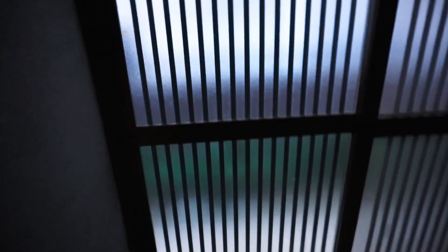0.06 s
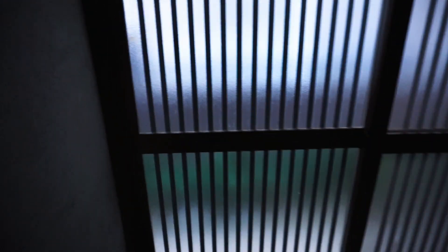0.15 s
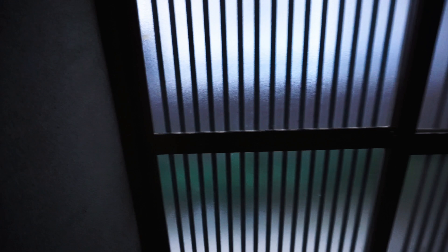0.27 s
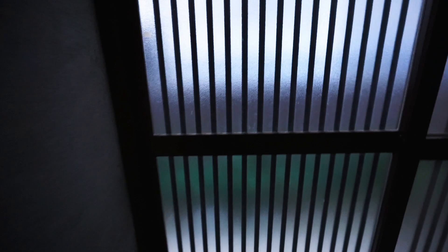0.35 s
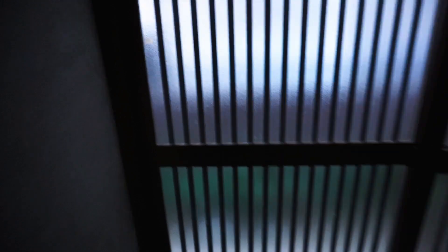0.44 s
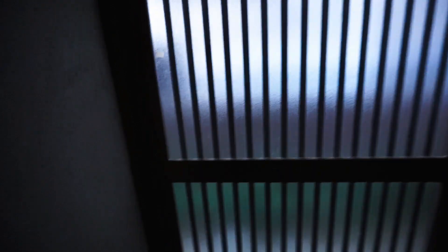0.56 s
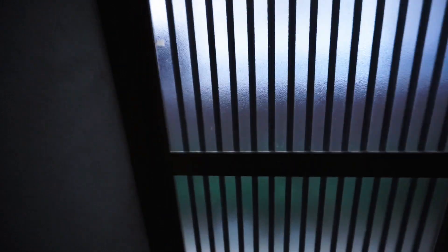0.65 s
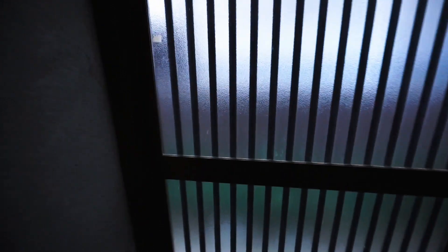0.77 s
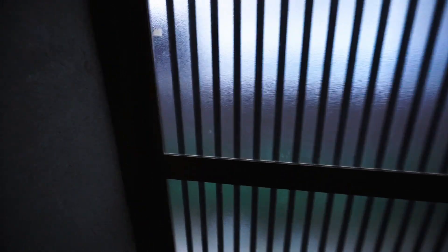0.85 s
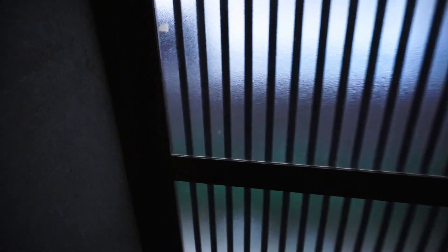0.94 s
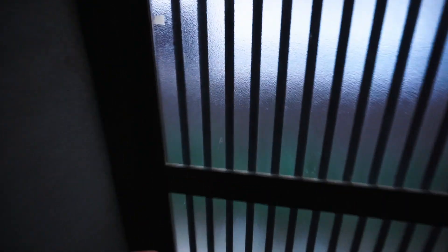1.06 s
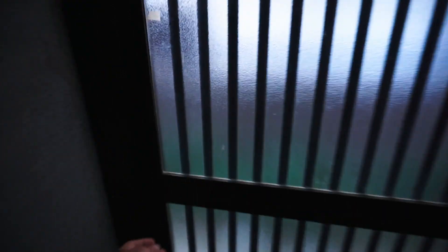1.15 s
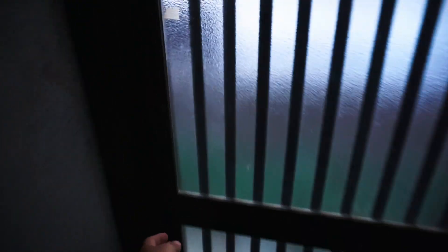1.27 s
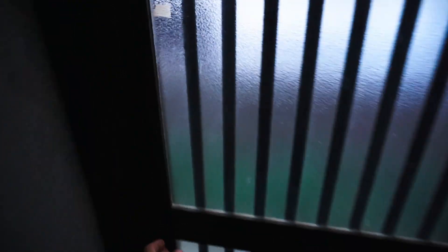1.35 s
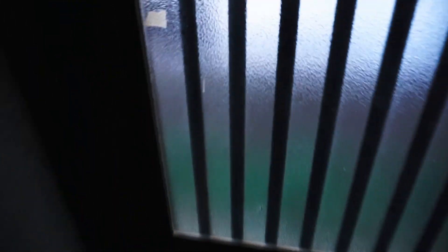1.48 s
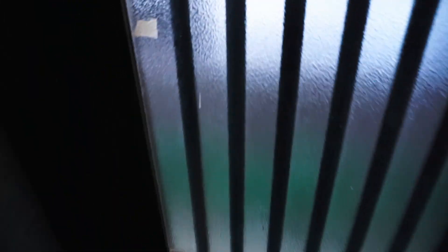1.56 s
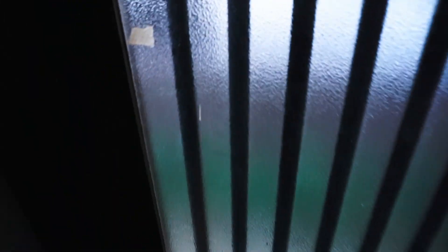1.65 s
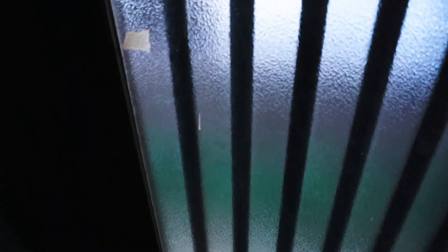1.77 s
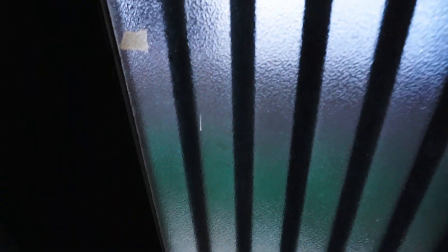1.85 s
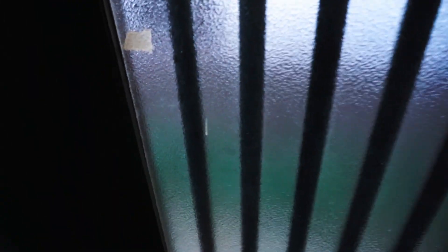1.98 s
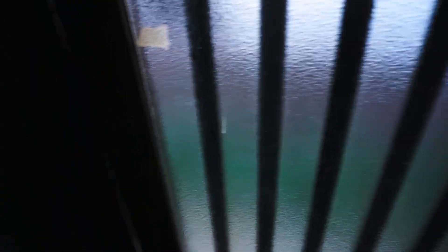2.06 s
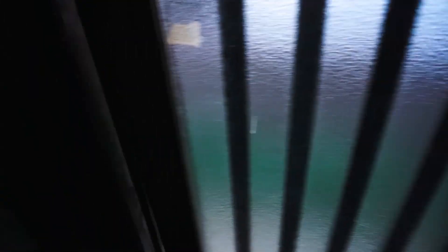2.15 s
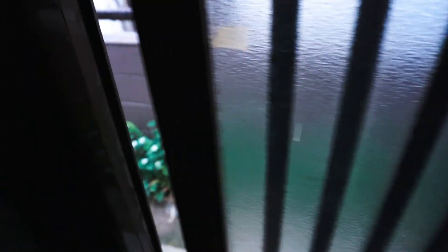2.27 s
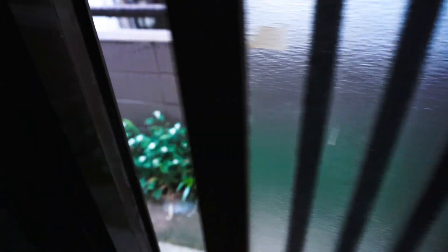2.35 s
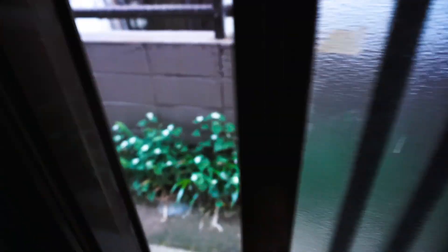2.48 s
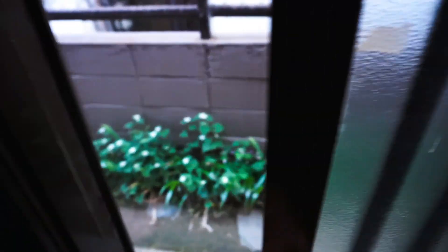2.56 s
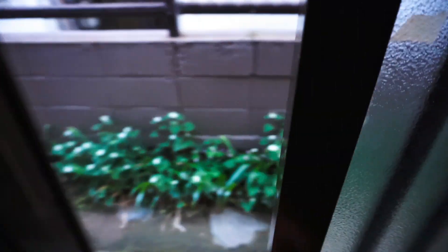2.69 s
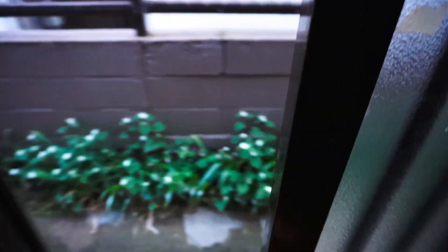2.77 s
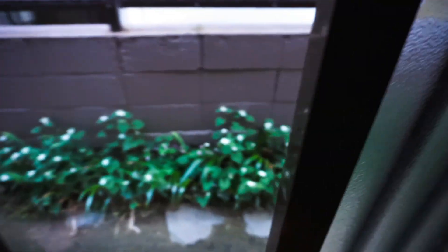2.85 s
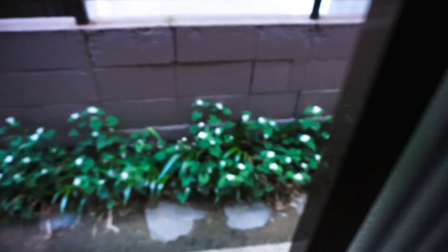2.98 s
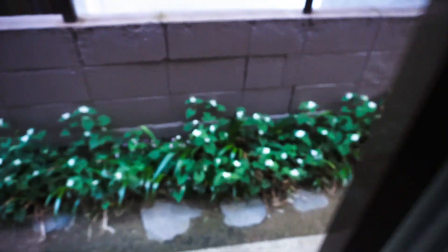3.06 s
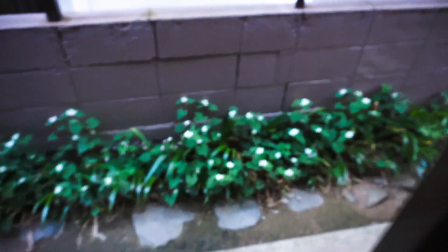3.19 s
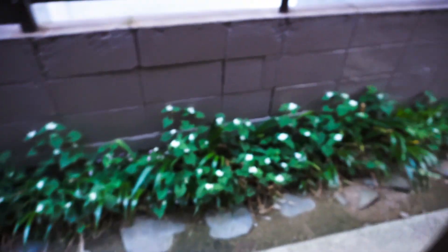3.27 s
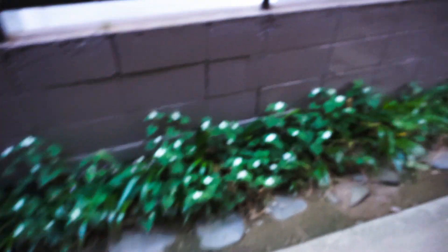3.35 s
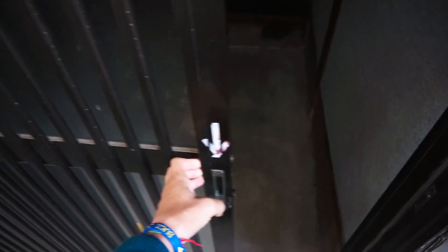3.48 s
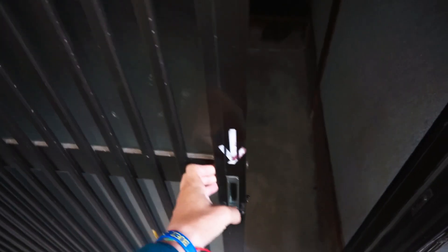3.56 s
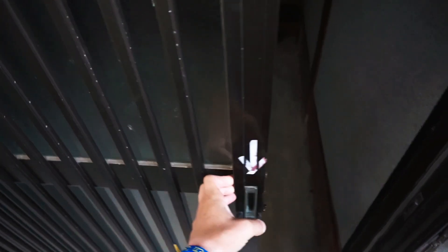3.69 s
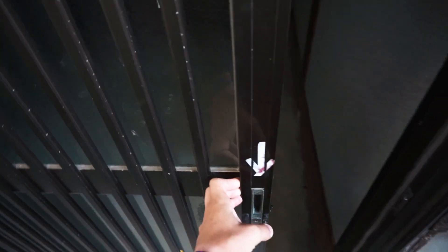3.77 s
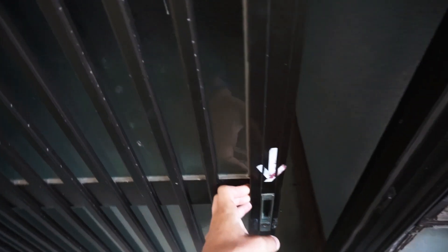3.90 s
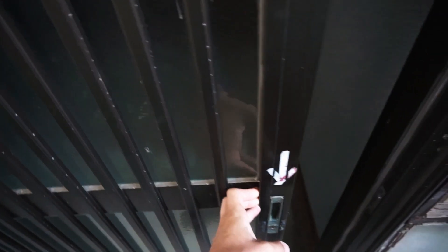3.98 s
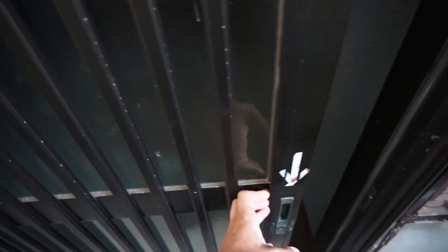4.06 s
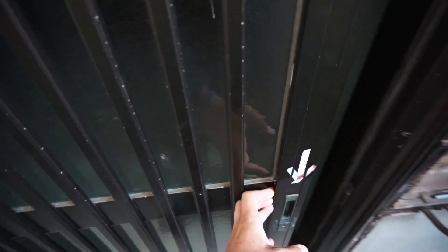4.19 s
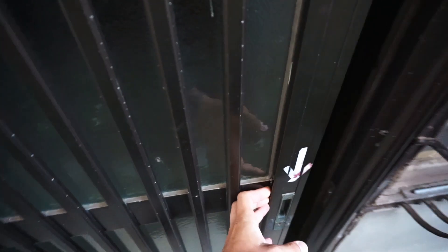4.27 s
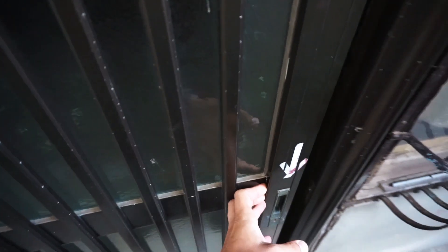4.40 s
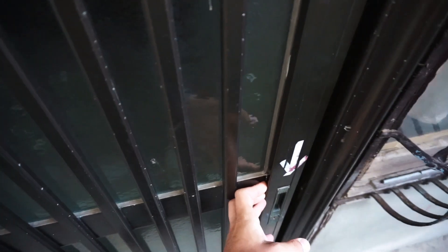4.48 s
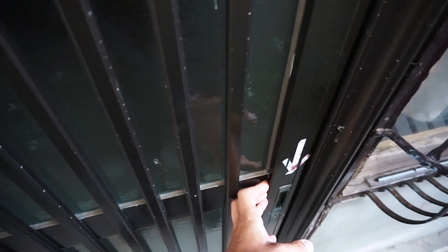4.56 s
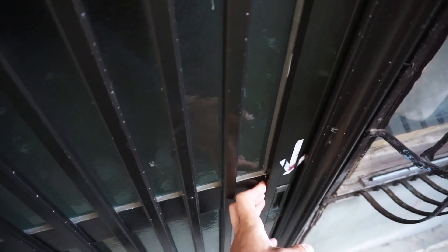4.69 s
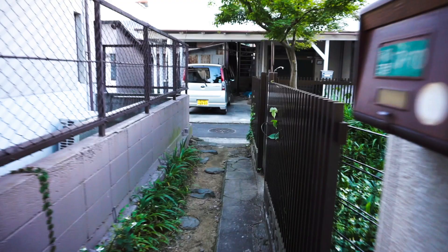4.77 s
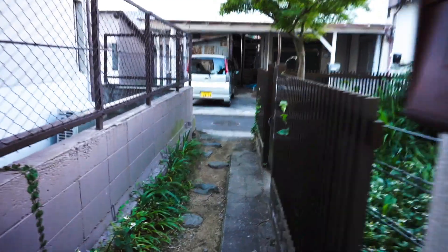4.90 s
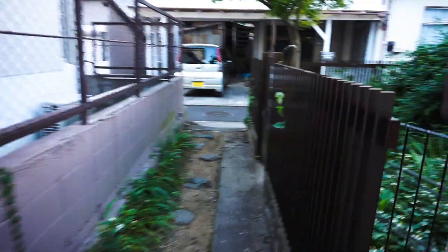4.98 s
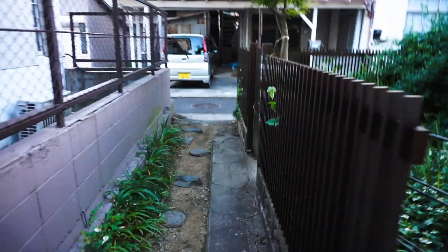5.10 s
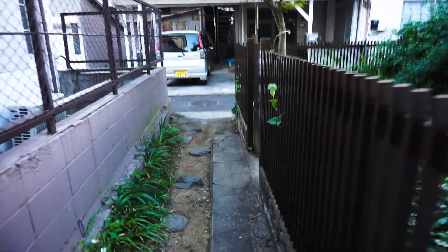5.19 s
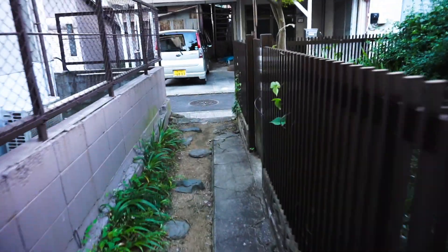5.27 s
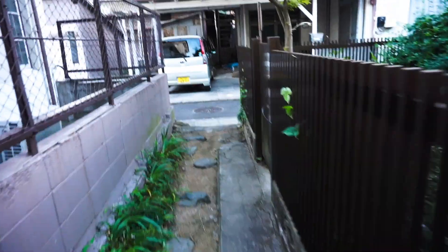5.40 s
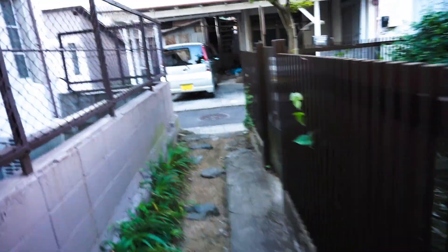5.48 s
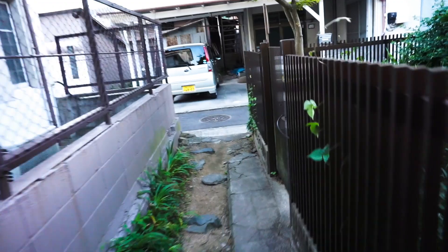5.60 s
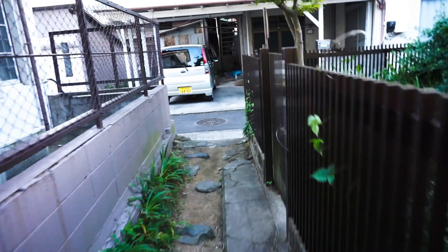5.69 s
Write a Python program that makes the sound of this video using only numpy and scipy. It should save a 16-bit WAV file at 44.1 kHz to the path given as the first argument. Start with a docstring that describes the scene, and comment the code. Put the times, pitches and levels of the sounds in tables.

```python
"""A wooden lattice door with glass panes is unlatched, slid open and drawn shut, close by in a house entrance.
The push on the door drives the drone of its frame and the chatter of its loose panes; bumps in the rail
make them knock. The wheels grind dust and sing faintly, wood binds on the jamb, and the latch clinks.
Soles and sleeves rub before and after, over faint outdoor air; the small porch answers the impacts."""
import sys
import numpy as np
from scipy import signal
from scipy.fft import rfft, irfft, next_fast_len
from scipy.io import wavfile
from scipy.ndimage import uniform_filter1d, map_coordinates

SR = 44100
rng = np.random.default_rng(int(sys.argv[2]) if len(sys.argv) > 2 else 0)


def store_pcm(level_fs):
    """Save levels as 16-bit WAV."""
    pcm = np.round(np.clip(level_fs, -1, 1) * 32767).astype(np.int16)
    wavfile.write(sys.argv[1], SR, np.atleast_2d(pcm).T)


N = 253134
TIME = np.arange(N) / SR
AGE = np.arange(SR // 6) / SR  # s since a contact


def amp(db):
    return 10 ** (np.asarray(db) / 20)


def unit(x):
    return x / np.sqrt(np.mean(x ** 2) + 1e-20)


def crest(x):
    """Scale a hit to rms 1 over its loudest 4 ms."""
    return x / np.sqrt(uniform_filter1d(np.mean(x ** 2, axis=0), SR // 250).max())


def along(points, hz):
    """Interpolate (f/Hz, value) points on a log axis."""
    f, value = np.transpose(points)
    return np.interp(np.log(hz + 1), np.log(f), value)


def curve(points):
    """Interpolate (t/s, value) points per sample."""
    return np.interp(TIME, *np.transpose(points))


def envelope(points):
    """Gain per sample from (t/s, level/dB) points; silent outside them."""
    return amp(np.interp(TIME, *np.transpose(points), left=-120, right=-120))


def wobble(knots_per_s):
    """Smooth random curve."""
    knots = rng.standard_normal(int(N * knots_per_s / SR) + 4)
    return map_coordinates(knots, [TIME * knots_per_s / SR])


def filtered(x, response):
    """Apply a complex frequency response."""
    size = next_fast_len(x.shape[-1] + SR // 20)
    return irfft(rfft(x, size) * response(np.fft.rfftfreq(size, 1 / SR)), size)[..., :x.shape[-1]]


def coloured(x, points, size=2048):
    """Minimum-phase filter through (f/Hz, gain/dB) points."""
    cepstrum = irfft(np.log(amp(along(points, np.fft.rfftfreq(size, 1 / SR)))))
    cepstrum[1:size // 2] *= 2
    cepstrum[size // 2 + 1:] = 0
    impulse = irfft(np.exp(rfft(cepstrum)))
    return signal.fftconvolve(x, impulse[None], axes=1)[:, :x.shape[1]]


def resonances(modes, f):
    """Summed response of (f/Hz, width/Hz, gain/dB) modes."""
    return sum(amp(db) * 1j * f * width / (hz * hz - f * f + 1j * f * width) for hz, width, db in modes)


def through_part(x, part, direct_db, size=8192):
    """Vibration crosses a door part and picks up its (f/Hz, gain/dB, t60/s) modes."""
    modes = [(hz, np.log(1000) / np.pi / t60, db) for hz, db, t60 in part]
    impulse = irfft(1 + resonances(modes, np.fft.rfftfreq(size, 1 / SR)) / amp(direct_db))
    return signal.fftconvolve(x, impulse[None], axes=1)[:, :N]


# Stereo width: f/Hz, side re mid/dB
STEREO_WIDTH = [(60, -26), (130, -46), (330, -22), (600, -9.5), (1200, -7.5), (2400, -3), (5000, 0.5),
                (14000, -1)]
def spread(x):
    """Two unrelated signals become left and right, alike in the bass."""
    def weights(hz):
        share = amp(along(STEREO_WIDTH, hz))
        return np.array([np.ones_like(hz), share]) / np.hypot(1, share)
    mid, side = filtered(x, weights)
    return np.array([mid + side, mid - side])


def grit(per_s, scatter_db):
    """Stream of tiny contacts of uneven size."""
    sizes = (rng.random(N) < per_s / SR) * amp(scatter_db * rng.standard_normal(N))
    return spread(sizes * rng.standard_normal((2, N)))


def onset(rise_s):
    return 1 - np.exp(-AGE / rise_s)


def burst(t60, rise_s):
    """Noise that swells and dies."""
    return spread(rng.standard_normal((2, len(AGE)))) * amp(-60 * AGE / t60) * onset(rise_s)


def ring(modes, scatter_db, drift_hz=25):
    """Damped (f/Hz, level/dB, t60/s) modes, new strengths per hit; looseness makes the phases wander."""
    hz, db, t60 = np.transpose(modes)[:, :, None]
    level = amp(db + scatter_db * rng.standard_normal(hz.shape) - 60 * AGE / t60)
    wander = np.cumsum(rng.standard_normal(level.shape), axis=1) * np.sqrt(2 * np.pi * drift_hz / SR)
    waves = level * np.exp(1j * (2 * np.pi * hz * AGE + wander))
    phases = np.exp(2j * np.pi * rng.random((2, len(modes))))
    return crest(spread((phases @ waves).real * onset(0.00032)))


def clack(hz, t60):
    """Cluster of close modes around one pitch."""
    modes = [(hz * .86, -8, t60), (hz, 0, t60), (hz * 1.07, -6, t60), (hz * 1.22, -9, t60)]
    return ring(modes, scatter_db=1, drift_hz=30.8)


def stroke(s, length_s, t60, rise_s=0.017):
    """Envelope of a rub: rise, hold, fade."""
    return np.clip((TIME - s) / rise_s, 0, 1) * amp(-60 * np.maximum(TIME - s - length_s, 0) / t60)


def add(track, s, sound):
    start = max(0, round(s * SR))
    part = sound[:, :N - start]
    track[:, start:start + part.shape[1]] += part


# Outdoor air: t/s, level/dB
AIR_LEVEL = [(0, -49.5), (0.4, -56.5), (0.9, -53.5), (1.5, -51), (4.6, -42), (5.3, -51.5), (5.74, -50.5)]
# Its spectrum: f/Hz, gain/dB
AIR_SPECTRUM = [(25, -30), (70, -35), (150, -12.5), (300, -8), (900, -0.5), (1600, -0.5), (2800, -3.5),
                (7000, -9), (11700, -8), (16000, -5.5)]
def air(diffuse_db=-3):
    """Faint wash from the lane, partly from all sides."""
    wash = spread(rng.standard_normal((2, N))) + amp(diffuse_db) * rng.standard_normal((2, N))
    return envelope(AIR_LEVEL) * unit(coloured(wash, AIR_SPECTRUM))


# Low rumble: t/s, level/dB
RUMBLE_LEVEL = [(0.9, -82), (1.3, -66), (1.5, -59), (2.0, -60.5), (2.16, -62), (2.26, -43), (2.46, -37),
                (2.7, -42), (2.95, -60), (3.55, -60), (4.06, -42), (4.38, -41), (4.62, -49), (4.78, -41.5),
                (5.05, -65), (5.74, -65.5)]
# Its spectrum: f/Hz, gain/dB
RUMBLE_SPECTRUM = [(20, 15.5), (45, -24), (80, 2.5), (125, 10.5), (200, 8), (280, 6), (500, 5),
                   (1000, -53.5)]
def rumble(bumps):
    """Low rumble: faint background before and after, swelling as the door rolls and shuts."""
    return envelope(RUMBLE_LEVEL) * unit(coloured(grit(2500, 0.96) * bumps, RUMBLE_SPECTRUM))


# Porch decay: f/Hz, t60/s
PORCH_DECAY = [(150, 0.48), (1000, 0.13), (4000, 0.17), (14000, 0.32)]
def porch(x):
    """Wall reflections; each frequency dies at its own rate."""
    hz, t, noise = signal.stft(rng.standard_normal((2, SR // 2)), SR, nperseg=256)
    decay = amp(-60 * t / along(PORCH_DECAY, hz)[:, None])
    tail = spread(signal.istft(noise * decay, SR, nperseg=256)[1])
    delayed = np.pad(tail / np.linalg.norm(tail[0]), ((0, 0), (SR // 150, 0)))
    return signal.fftconvolve(x, delayed, axes=1)[:, :N]


# Settling foot: f/Hz, gain/dB
SOLE_SPECTRUM = [(30, -14), (70, -13), (130, 1), (190, -4), (260, -10), (500, -17), (1500, -25),
                 (5000, -58)]
def footfall(peak_s=5.505, level_db=-38, rise_t60=0.12, fall_t60=0.11):
    """A foot rolls onto the path: the weight builds, then settles."""
    load_db = -60 * np.maximum((peak_s - TIME) / rise_t60, (TIME - peak_s) / fall_t60)
    return amp(level_db + load_db) * unit(coloured(grit(4000, 1), SOLE_SPECTRUM))


# Sleeve swishes: t/s, half length/s, level/dB
SLEEVE_SWISHES = [(1.183, .014, -46), (1.405, 0.052, -40.5), (4.94, .03, -40)]
# Cloth: f/Hz, gain/dB
SLEEVE_SPECTRUM = [(4000, -25), (8000, -10), (10500, -4), (13300, 2), (16000, -3)]
def swishes():
    """Smooth cloth slides with a very high hiss."""
    swell = sum(amp(db) * np.exp(-((TIME - s) / half_s) ** 2) for s, half_s, db in SLEEVE_SWISHES)
    return swell * unit(coloured(grit(25000, 2), SLEEVE_SPECTRUM))


# Sole drags: t/s, length/s, t60/s, level/dB
SOLE_DRAGS = [(0.44, 0.26, 0.52, -56.5), (0.634, 0.038, .15, -61), (5.123, 0.059, 0.19, -53)]
def drags():
    """Soft soles rub with a hollow note."""
    hollow = [(150, -24), (380, -6.5), (500, -14), (720, -4), (1000, -10), (2500, -23), (8000, -38)]
    level = sum(amp(db) * stroke(s, length_s, t60) for s, length_s, t60, db in SOLE_DRAGS)
    return level * unit(coloured(grit(4000, 2), hollow))


# Fine contacts: f/Hz, gain/dB
HISS_SPECTRUM = [(2000, -8), (5000, 4), (7500, 2), (10500, 3), (12500, 2.5), (14500, -2), (16000, 6)]
def rubs(strokes, spectrum, grip_db, rough_db):
    """Rubbing is a dense stream of slips: coarse ones scrape, fine ones hiss."""
    coarse, fine = sum(amp([[coarse_db], [fine_db]]) * stroke(s, length_s, t60)
                       for s, length_s, t60, coarse_db, fine_db in strokes)
    grip = amp(grip_db * wobble(120))
    scrape = coarse * unit(coloured(grit(15000, rough_db) * grip, spectrum))
    hiss = fine * unit(coloured(grit(25000, 3.6) * grip, HISS_SPECTRUM))
    return scrape, hiss


# Scuffs: t/s, length/s, t60/s, scrape/dB, hiss/dB
SCUFF_STROKES = [(-.02, 0.094, 0.032, -46, -41), (0.443, 0.019, 0.76, -52, -43.5),
                 (0.597, 0.02, 0.74, -49, -41.5), (0.799, 0.034, 0.29, -52, -52),
                 (1.157, 0.022, 0.23, -59, -51), (1.199, 0.096, 0.37, -52.5, -52),
                 (1.303, 0.14, 0.22, -47.5, -45), (4.874, 0.082, 0.57, -44, -37),
                 (5.523, 0.047, 0.34, -50, -50.5), (5.648, 0.033, 0.15, -52, -51)]
# Their scrape: f/Hz, gain/dB
SCUFF_SPECTRUM = [(40, -43), (130, -8), (300, -1.5), (750, 3), (1500, 0.5), (2800, 1.5), (4000, -1),
                  (5200, -8.5), (7500, -10), (12000, -64)]
def scuffs():
    """Soles rub on concrete, sleeves on cloth."""
    scrape, hiss = rubs(SCUFF_STROKES, SCUFF_SPECTRUM, grip_db=1.1, rough_db=4)
    cloth = [(3000, 0.32), (7000, -1.4), (10000, 1.0), (13000, 0.94), (16000, -0.82)]
    return scrape + coloured(hiss, cloth)


# Soft steps and bumps: t/s, relative level/dB, f/Hz, t60/s
SOFT_CONTACTS = [(0, -46, 182, 0.1), (0.451, -37, 340, 0.0086), (1.233, -34.5, 276, 0.015),
                 (1.26, -39.5, 155, 0.063), (1.321, -24, 298, 0.012), (1.35, -34, 162, 0.067),
                 (1.613, -25.5, 300, 0.017), (2.102, -32, 810, 0.076), (4.665, -32.5, 222, 0.028),
                 (4.704, -27, 108, 0.02), (4.763, -24, 194, 0.0093), (4.79, -23, 172, 0.01),
                 (4.871, -27, 242, 0.041), (4.897, -27.5, 136, 0.015), (4.978, -35.5, 236, 0.1),
                 (5.129, -39, 450, 0.012), (5.498, -31.5, 170, 0.014)]
def thuds(level_db=-5, puff_db=-9):
    """A soft contact is a low damped push with a dull puff."""
    out = np.zeros((2, N))
    for s, db, hz, t60 in SOFT_CONTACTS:
        swell = onset(1 / (1.5 * hz))  # within the first cycle
        push = np.gradient(np.sin(2 * np.pi * hz * AGE) * amp(-60 * AGE / t60) * swell)
        dull = [(hz / 4, -25), (hz, 0), (hz * 1.47, -7), (hz * 4, -22), (hz * 30, -55)]
        puff = coloured(burst(0.16, 0.0028), dull)
        add(out, s, amp(db + level_db) * (crest(push[None]) + amp(puff_db) * crest(puff)))
    return out


# Grit and fittings: t/s, relative level/dB, f/Hz, t60/s, ringing share/0-1
DRY_TICKS = [(.004, -22, 3440, 0.06, 0.96), (0.047, -25, 3200, 0.089, 0.2),
             (0.067, -12.5, 3600, 0.014, 0.12), (0.708, -32.5, 11000, 0.071, 0.1),
             (0.825, -34.5, 3500, 0.082, 0.06), (.845, -26, 3880, 0.036, 0.8),
             (1.587, -6.5, 12500, 0.034, 0), (1.851, -22, 3000, 0.015, 0), (1.869, -39, 5000, 0.0089, 0),
             (1.881, -29, 3080, 0.011, 0), (1.893, -27, 9100, .01, 0.3), (2.067, -21.5, 9240, 0.027, 1),
             (2.478, -22, 2420, 0.011, 0.3), (2.579, -5, 3640, 0.0054, 0.14),
             (4.043, -14.5, 14200, 0.032, 0.4), (4.312, -18.5, 13200, 0.046, 0.3),
             (4.664, -26, 12200, 0.087, 0.15), (4.7097, -7, 3700, 0.0062, 0.1), (4.711, -23, 970, 0.099, 1),
             (5.088, -26.5, 11300, 0.035, 0.04), (5.129, -32, 960, 0.025, 0),
             (5.244, -35, 2540, 0.035, 0.2)]
def ticks(level_db=-10):
    """Tiny snaps, each around its own pitch; hard pieces ping."""
    out = np.zeros((2, N))
    for s, db, hz, t60, share in DRY_TICKS:
        spectrum = [(hz / 8, -20), (hz / 2, -8), (hz, 0), (hz * 1.22, -8), (hz * 4, -14)]
        snap = crest(coloured(burst(t60, 0.00006), spectrum))
        ping = ring([(hz, 0, t60)], scatter_db=0)
        add(out, s, amp(db + level_db) * (np.sqrt(1 - share) * snap + np.sqrt(share) * ping))
    return out


def metal(hits, modes, spectrum, level_db, t60, rough_db):
    """Small metal pieces strike: a gritty crack and a high ring."""
    out = np.zeros((2, N))
    for s, db, ring_db in hits:
        teeth = amp(rough_db * wobble(500)[:len(AGE)])
        crack = crest(coloured(burst(t60, 0.00063) * teeth, spectrum))
        ringing = amp(ring_db) * ring(modes, scatter_db=2.6, drift_hz=30)
        add(out, s, amp(db + level_db) * crest(crack + ringing))
    return out


# Jingles: t/s, relative level/dB, ring re crack/dB
JINGLE_HITS = [(.003, -33, 5), (4.716, -24, 3), (4.726, -17.5, 5), (4.748, -20, 0)]
# Small metal parts: f/Hz, level/dB, t60/s
JINGLE_MODES = [(11400, -9, .06), (12800, -7, .06), (13500, -6, .07), (13879, -4, .1), (14100, -6, .08),
                (14465, 0, .12), (15020, -7, .07), (15320, -1, .12)]
def jingles():
    """Small metal parts strike together, left of centre."""
    hits = metal(JINGLE_HITS, JINGLE_MODES, HISS_SPECTRUM, level_db=0.5, t60=0.14, rough_db=3)
    return hits * amp([[1.5], [-2]])


# Latch clinks: t/s, relative level/dB, ring re crack/dB
LATCH_HITS = [(3.477, -20.5, -8), (3.503, -25, -4), (3.515, -15, -12), (3.572, -26, -10), (3.587, -18, -5),
              (3.592, -21, -9), (3.597, -10, 5.5), (3.602, -16, 11)]
# Latch ring: f/Hz, level/dB, t60/s
LATCH_MODES = [(8630, 8, 0.04), (8950, 8, 0.054), (9621, 8, 0.11), (9796, 6, 0.17), (10100, -5, 0.06),
               (12310, -6, .07), (12700, 2, 0.055), (15570, -5, 0.068)]
# Latch scrape: f/Hz, gain/dB
LATCH_SPECTRUM = [(3000, -1), (6500, -5), (7900, -1), (8800, 3.5), (10200, 3), (11400, -1), (12700, 3),
                  (14000, -7), (15000, -6), (15700, 3.5)]
def latch():
    """The latch scrapes and rings as it swings free."""
    return metal(LATCH_HITS, LATCH_MODES, LATCH_SPECTRUM, level_db=-6.5, t60=0.13, rough_db=3.5)


# Catch ring: f/Hz, level/dB, t60/s
CATCH_MODES = [(1130, -18, 0.055), (2130, 0, .06), (2474, 5, 0.039), (3180, -1, 0.057), (3950, -2, .05),
               (4380, -7, .05)]
def catch(start_s=2.066, level_db=-24, crack_db=-5):
    """The door leaves its catch with one bright clack."""
    out = np.zeros((2, N))
    bright = [(500, -18), (2500, 2), (4500, 3.5), (6000, -8), (9000, -4), (15000, -18)]
    crack = crest(coloured(burst(0.08, 0.0026), bright))
    ringing = ring(CATCH_MODES, scatter_db=1, drift_hz=34) * onset(0.0017)
    add(out, start_s, amp(level_db) * crest(ringing + amp(crack_db) * crack))
    return out


# Door on jamb: t/s, length/s, t60/s, relative scrape/dB, hiss/dB
JAMB_STROKES = [(1.59, 0.085, 0.46, -29, -27.5), (1.71, 0.048, 0.26, -32, -32),
                (1.845, 0.029, 0.062, -39.5, -40), (4.695, 0.053, 0.33, -24.5, -25),
                (4.81, 0.038, 0.019, -32.5, -33.5)]
# Wood scrape: f/Hz, gain/dB
JAMB_SPECTRUM = [(40, -36), (130, -7), (320, 6), (520, -0.5), (700, -0.5), (1500, -0.5), (2800, 3.5),
                 (4000, 4), (5200, 0), (7500, -7), (12000, -35)]
# Door edge and lock: f/Hz, level/dB, t60/s
EDGE_MODES = [(500, -11, .06), (690, -6, .08), (960, -4, .08), (1130, -4, .08), (1281, 0, .07),
              (1750, -5, .08), (2200, -5, .06), (2500, -2, .06), (3060, -1, .06), (3510, -5, .04),
              (4040, -3, .06), (4807, -7, .05)]
def jamb(scrape_db=-3):
    """Wood binds on wood as the door comes free and shuts; its edge rings along."""
    scrape, hiss = rubs(JAMB_STROKES, JAMB_SPECTRUM, grip_db=1, rough_db=1.5)
    return amp(scrape_db) * through_part(scrape, EDGE_MODES, direct_db=-3) + hiss


# Blows of latch and door: t/s, relative level/dB, t60/s, f/Hz
EDGE_BLOWS = [(1.583, -13, 0.072, 4010), (1.587, -12, 0.026, 1300), (1.655, -24.5, 0.058, 4040),
              (1.667, -37, 0.073, 3600), (1.728, -17, 0.17, 1780), (1.744, -16.5, 0.2, 3960),
              (4.6645, -10, 0.067, 2930), (4.6675, -9, 0.035, 1326), (4.722, -13, 0.036, 2980),
              (4.747, -29, .04, 3250), (4.791, -17, 0.047, 1960), (4.828, -23, .035, 3770),
              (4.841, -38, 0.032, 4240)]
# Impact: f/Hz, gain/dB
BLOW_SPECTRUM = [(60, -105), (200, -11), (500, 5.5), (1100, -0.5), (2400, 2.5), (3800, 4), (5500, -9.5),
                 (10000, -7.5), (15000, -11)]
# Outer lattice: f/Hz, level/dB, t60/s
LATTICE_MODES = [(998, -11, 0.095), (1154, -7, 0.089), (1438, -6.5, 0.083), (2226, -5.5, 0.084),
                 (2550, -6, 0.048), (3750, -5, 0.033), (4050, 3, 0.029)]
def blows(level_db=-10, note_db=-7, ring_db=-2):
    """Hard, damped impacts ring the door's edge and shake the lattice."""
    out = np.zeros((2, N))
    for s, db, t60, hz in EDGE_BLOWS:
        impact = crest(coloured(burst(t60, 0.0012), BLOW_SPECTRUM))
        edge = amp(ring_db) * ring(EDGE_MODES, scatter_db=6.2, drift_hz=21) * onset(0.0056)
        note = amp(note_db) * clack(hz, t60)
        add(out, s, amp(db + level_db) * crest(impact + note + edge))
    return through_part(out, LATTICE_MODES, direct_db=2)


# Wheel squeals, one list each: t/s, f/Hz, level/dB
WHEEL_SQUEALS = [
    [(2.66, 10600, -57), (2.72, 10850, -48), (2.8, 11250, -52), (2.88, 11400, -64)],
    [(2.72, 12800, -55), (2.79, 13250, -46), (2.86, 12900, -55)],
    [(4.1, 11600, -60), (4.18, 11600, -50), (4.24, 11900, -58), (4.3, 12400, -49)],
    [(4.33, 11700, -51), (4.37, 10900, -52), (4.39, 10600, -60), (4.42, 10300, -54), (4.48, 9300, -58),
     (4.52, 8800, -64)],
]
def squeals():
    """A dry wheel sings in thin, scratchy snatches; the last one falls in pitch."""
    out = np.zeros(N)
    for squeal in WHEEL_SQUEALS:
        s, hz, db = np.transpose(squeal)
        pitch_hz = np.interp(TIME, s, hz) * (1 + .006 * wobble(500) + .004 * wobble(40))
        grip = np.clip(.55 + .5 * wobble(55), 0, 1.1)
        out += grip * envelope(np.transpose([s, db])) * np.sin(2 * np.pi * np.cumsum(pitch_hz) / SR)
    return out


# Push on the door: t/s, level/dB (full speed at full_db)
DOOR_PUSH = [(2.0, -78), (2.15, -49), (2.27, -36.5), (2.4, -29), (2.52, -27), (2.6, -27.5), (2.72, -26),
             (2.95, -26.5), (3.14, -26), (3.24, -29), (3.48, -36), (3.66, -33), (3.78, -36), (3.9, -33),
             (4.17, -36), (4.34, -44), (4.52, -58), (4.66, -78)]
def speed(full_db=-25.5):
    """Door pace: 1 at full push, 0 at rest."""
    moving = (TIME > DOOR_PUSH[0][0]) * (TIME < DOOR_PUSH[-1][0])
    return envelope(DOOR_PUSH) / amp(full_db) * moving


def sand(level_db=-45, speed_power=0.19):
    """Coarse grains crack under the wheels as sparse ticks."""
    grains = signal.fftconvolve(grit(70, 4), burst(.008, .0002), axes=1)[:, :N]
    return amp(level_db) * speed() ** speed_power * unit(coloured(grains, HISS_SPECTRUM))


# Rail dust: f/Hz, gain/dB
DUST_SPECTRUM = [(2000, 1), (5000, -26), (8000, -11), (10500, 2), (12800, 7), (14500, 6), (16000, -19)]
def dust(bumps, level_db=-42, speed_power=0.32):
    """Dust hisses under the wheels."""
    hiss = unit(coloured(grit(11000, 4) * bumps, DUST_SPECTRUM))
    return amp(level_db) * speed() ** speed_power * hiss


# Rattling glass: f/Hz, gain/dB
GLASS_SPECTRUM = [(100, -20), (600, -9), (900, -1), (1200, -0.5), (2300, -3), (2900, -5), (3700, -5.5),
                  (4700, -7.5), (6500, -10), (10000, -15), (15000, -21.5)]
# First pane to rattle: f/Hz, level/dB, t60/s
FRONT_PANE_MODES = [(1167, -10, 0.23), (1522, -8, 0.1), (2050, -2, 0.06), (2373, 0, 0.05),
                    (2560, -9, 0.058), (3460, -10, .09), (3820, -5.5, .08), (4270, -7, 0.056)]
# Second pane: f/Hz, level/dB, t60/s
REAR_PANE_MODES = [(1156, -4.5, 0.066), (1484, -2, 0.11), (1825, -3, 0.056), (2047, -4, 0.073),
                   (2290, -5, .07), (2644, -3.5, .06), (3000, -2.5, .07), (4000, -5, 0.048)]
REAR_PANE_S, OUTDOORS_S = 2.66, 3.45  # second pane takes over; listener is past the doorway
def chatter(bumps, level_db=-37.5, speed_power=0.24):
    """Front pane, rear pane and lattice tremble in turn as the door moves."""
    shake = coloured(grit(6000, 0.17), GLASS_SPECTRUM)
    front, rear, lattice = (unit(through_part(shake, modes, direct_db=-5))
                            for modes in (FRONT_PANE_MODES, REAR_PANE_MODES, LATTICE_MODES))
    tremble = np.select([TIME < REAR_PANE_S, TIME < OUTDOORS_S], [front, rear], lattice)
    return amp(level_db) * speed() ** speed_power * unit(tremble * bumps)


# Frame at rest: f/Hz, width/Hz, gain/dB
FRAME_MODES = [(142.6, 3, -16), (193, 9, -3), (315, 8, -1), (347.8, 12, 9.5), (378, 18, 1), (410, 20, -7),
               (452, 18, -2), (526.5, 10, -11), (694, 16, -14)]
# Frame loosening: t/s, share/0-1
FRAME_LOOSENESS = [(3.3, 0), (3.8, .35), (4.3, .6)]
# Main note under wheel load: t/s, f/Hz
FRAME_PITCH = [(2.15, 336), (2.42, 339), (2.56, 359.3), (2.88, 361.3), (3.0, 346.1), (3.36, 341.6),
               (3.63, 365.1), (3.86, 355.7), (4.12, 342), (4.4, 310.6)]
# Dents in the rail: t/s, swell/dB
RAIL_JOLTS = [(2.28, 9.5), (2.447, 6), (2.516, 3), (2.551, 4), (2.574, 10), (2.61, 5.5), (2.627, 8.5),
              (2.693, 4), (2.726, 6), (2.757, 5), (2.797, 3), (2.821, 5.5), (2.855, 5.5), (2.905, 7),
              (2.937, 10), (2.96, 6), (2.987, 8.5), (3.024, 4), (3.048, 6), (3.071, 2.5), (3.107, 3),
              (3.134, 6.5), (3.157, 3), (3.64, 8), (3.7, 6), (3.914, 5), (4.02, 5)]
def drone(level_db=-29.5, judder_db=1.5, rest_hz=348, widen_hz=58, jolt_s=0.008):
    """The frame hums on the rough rail, swells at jolts, drifts in pitch and blurs late in the slide."""
    rail = grit(8000, 1)
    def shaken(modes):
        return unit(filtered(rail, lambda f: resonances(modes, f) / (1 + 1j * f / 900)))
    loose = curve(FRAME_LOOSENESS)
    wide_modes = [(hz, width + widen_hz, db) for hz, width, db in FRAME_MODES]
    frame = (1 - loose) * shaken(FRAME_MODES) + loose * shaken(wide_modes)
    power = uniform_filter1d(np.mean(frame ** 2, axis=0), SR // 60)
    frame = frame / np.abs(power) ** (1 / 3)  # joint friction evens out the swing
    clock = np.cumsum(curve(FRAME_PITCH) / rest_hz)
    bent = np.array([np.interp(clock, np.arange(N), side) for side in frame])
    jolts_db = sum(db * np.exp(-((TIME - s) / jolt_s) ** 2) for s, db in RAIL_JOLTS)
    return amp(level_db) * speed() * unit(bent * amp(jolts_db + judder_db * wobble(55)))


def rolling(bumps_db=1.5):
    """Over the low rumble, wheels on a rough rail shake glass and frame and grind dust and sand."""
    bumps = amp(bumps_db * wobble(30))
    return rumble(bumps) + chatter(bumps) + dust(bumps) + drone() + sand()


# Pane knocks: t/s, relative level/dB, f/Hz, treble/dB, buzz t60/s
PANE_KNOCKS = [(1.99, -40.5, 2510, 2, 0.042), (2.172, -22, 2510, -5, .06), (2.218, -24, 2310, -7, 0.054),
               (2.256, -25.5, 2380, 1, .035), (2.276, -19.5, 2176, -24, .055),
               (2.343, -16.5, 2434, 1.5, 0.056), (2.423, -25, 2310, 1, 0.18),
               (2.471, -16.5, 2440, -2, 0.052), (2.515, -23.5, 2355, 2, 0.11), (2.535, -20, 2365, -7, 0.13),
               (2.573, -16, 3478, 3, 0.097), (2.614, -21.5, 2144, -3, 0.086), (2.679, -24, 2170, 1, 0.13),
               (2.693, -23.5, 1523, -4, 0.15), (2.731, -20, 1456, -2, 0.11), (2.758, -29, 1500, 0, .08),
               (2.805, -26.5, 1810, 8, 0.065), (2.817, -17.5, 1800, 2.5, 0.059),
               (2.886, -26, 1920, 5, 0.21), (2.929, -21.5, 1787, 5.5, 0.087), (2.943, -24, 1870, -15, 0.1),
               (3.022, -18, 1770, 5, 0.13), (3.058, -22, 1870, 1, 0.12), (3.102, -22.5, 1496, 3, 0.093),
               (3.114, -22, 1554, 2, 0.12), (3.151, -20, 2120, 2, 0.089), (3.238, -24, 2137, -2, 0.083),
               (3.294, -29.5, 1634, -8, 0.11), (3.353, -32, 1652, -3, 0.073), (3.411, -27, 2416, -8, 0.063),
               (3.481, -23.5, 1880, -3, 0.12), (3.618, -26, 1285, -1, 0.093), (3.664, -26.5, 997, 5, 0.046),
               (3.712, -25.5, 3600, 6, 0.041), (3.765, -27, 1077, -2, 0.04), (3.836, -28, 2210, 3, 0.1),
               (3.885, -25, 1166, 6, 0.14), (3.912, -30.5, 1294, -10, 0.11), (4.021, -29, 1244, 5, .07),
               (4.071, -29, 1026, 12, 0.049), (4.094, -20.5, 2536, -1.5, 0.054),
               (4.117, -26.5, 2300, 1, 0.099), (4.171, -27.5, 1180, 2, .06), (4.23, -25, 1186, -8, 0.048),
               (4.289, -23.5, 1160, -3, 0.056), (4.356, -28.5, 1166, -7, 0.036),
               (4.43, -30.5, 1220, -1, 0.086), (4.487, -34.5, 2710, 24, 0.049),
               (4.527, -23.5, 1250, 0.5, 0.066)]
# Buzz heard from indoors: f/Hz, gain/dB
INDOOR_SPECTRUM = [(500, -12.5), (1300, -4.5), (2200, 1.5), (3800, -1.5), (7000, -4.5), (14000, -2)]
# Buzz heard from outdoors: f/Hz, gain/dB
OUTDOOR_SPECTRUM = [(500, 1), (1300, -2.5), (2200, 2.5), (3800, 3.5), (7000, -1.5)]
def knocks(level_db=-2, modes_db=-2, note_db=-5, full_speed_rise_s=0.005, ring_cycles=110):
    """Rail bumps make a pane buzz against the wood and ring; one pitch stands out."""
    out = np.zeros((2, N))
    pace = np.clip(speed(), .1, 1)
    for s, db, hz, treble_db, t60 in PANE_KNOCKS:
        rise_s = full_speed_rise_s * pace[round(s * SR)] ** 0.57
        note = crest(clack(hz, ring_cycles / hz) * onset(rise_s))
        if s < OUTDOORS_S:
            spectrum, modes = INDOOR_SPECTRUM, FRONT_PANE_MODES if s < REAR_PANE_S else REAR_PANE_MODES
        else:
            spectrum, modes = OUTDOOR_SPECTRUM, LATTICE_MODES
        buzz = crest(coloured(coloured(burst(t60, rise_s), GLASS_SPECTRUM), spectrum))
        reseated = [(f * (1 + .012 * rng.standard_normal()), level, life) for f, level, life in modes]
        ringing = amp(modes_db) * crest(ring(reseated, scatter_db=3.5, drift_hz=18) * onset(rise_s))
        knock = crest(coloured(buzz + ringing, [(2200, 0), (6000, treble_db)]))
        add(out, s, amp(db + level_db) * crest(knock + amp(note_db) * note))
    return out


def taps(level_db=-34, per_s=30, low_hz=1100, high_hz=3400, t60=0.035, speed_power=0.36, scatter_db=2):
    """Loose panes and slats tap lightly among the knocks, each at its own pitch."""
    out = np.zeros((2, N))
    pace = speed()
    first_s, last_s = PANE_KNOCKS[1][0], PANE_KNOCKS[-1][0]
    for when, high, loud in rng.random((round((last_s - first_s) * per_s), 3)):
        s = first_s + when * (last_s - first_s)
        note = clack(low_hz * (high_hz / low_hz) ** high, t60) * onset(0.00064)
        buzz = crest(coloured(burst(t60, 0.0021), GLASS_SPECTRUM))
        gain = amp(level_db + scatter_db * (2 * loud - 0.5)) * pace[round(s * SR)] ** speed_power
        add(out, s, gain * crest(note + buzz))
    return out


# Pane position: t/s, left minus right/dB
PANE_BALANCE = [(2.1, 0.5), (2.98, -1), (3.28, -4.5), (3.61, 1), (4.6, 2)]
def panes():
    """The rattling panes shift from side to side as the listener passes."""
    return (knocks() + taps()) * amp(curve(PANE_BALANCE) * np.array([[.5], [-.5]]))


def scene():
    """Hard door sounds excite the porch more than the small near ones; the rest stays dry."""
    hard = panes() + catch() + blows()
    near = latch() + jingles() + ticks() + thuds()
    impacts = hard + near + porch(amp(-4) * hard + amp(-19) * near)
    return impacts + rolling() + jamb() + scuffs() + drags() + swishes() + footfall() + squeals() + air()


def record(dry, bass_hz=60, top_hz=15800):
    """The microphone thins the deep bass; a steep low-pass limits the band."""
    thin = filtered(dry, lambda hz: 1j * hz / (bass_hz + 1j * hz))
    return filtered(thin, lambda hz: 1 / (1 + (hz / top_hz) ** 200))


dry = scene()
out = record(dry)
store_pcm(out)
```